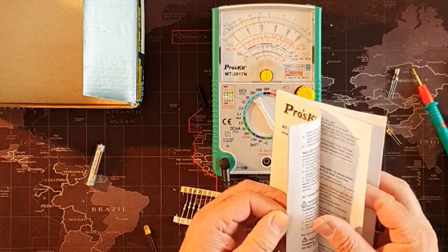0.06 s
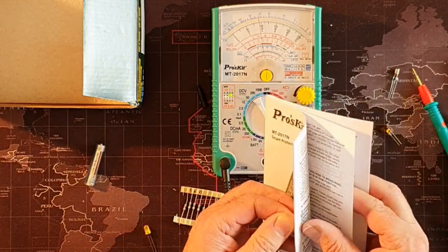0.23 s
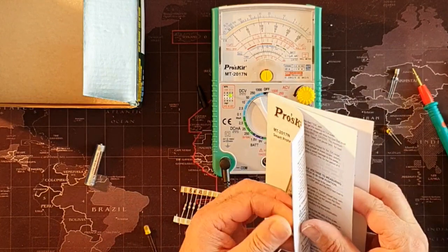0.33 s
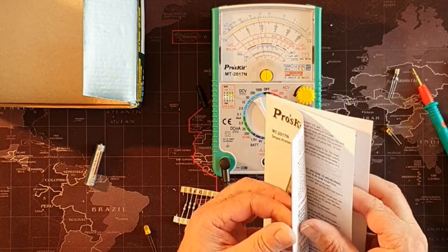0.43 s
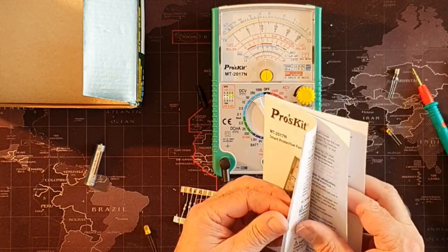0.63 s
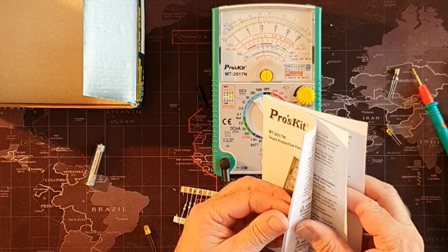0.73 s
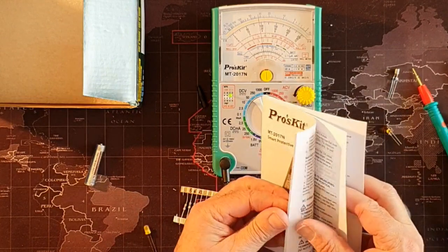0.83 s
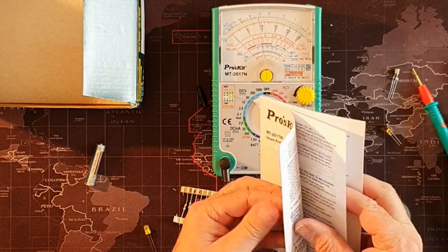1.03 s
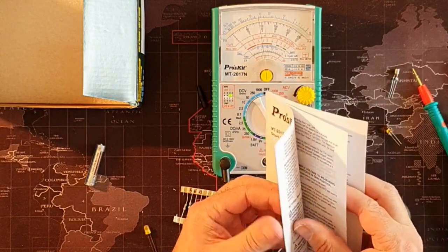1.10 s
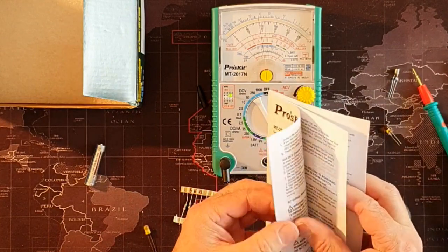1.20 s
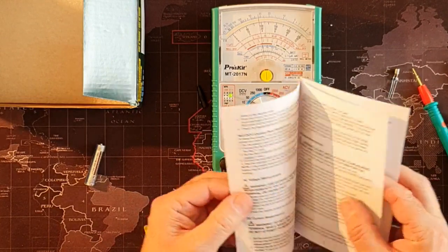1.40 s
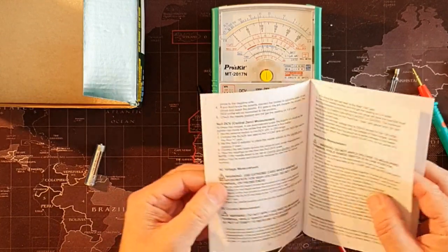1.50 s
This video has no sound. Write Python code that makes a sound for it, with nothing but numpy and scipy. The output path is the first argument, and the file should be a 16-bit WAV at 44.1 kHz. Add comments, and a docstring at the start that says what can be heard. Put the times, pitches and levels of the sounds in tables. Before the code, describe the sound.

Close, dry paper page-turning in a small room; strong snaps and edge flicks come early, one shorter flurry follows after a gap, then faint sliding and light ticks with low hand thumps over soft air noise.

```python
"""A thin paper booklet is leafed through by hand, close to the microphone, above a desk in a small room.
Bent pages snap over, edges flick off the thumb and sheets slide on each other: clusters of tiny clicks
that ring the page stack, the loose sheet, its stiff fold and its edge. The fingers add dull bumps, made of
low decaying sines. Behind them lie a short room tail, soft air noise, a faint hum and stereo hiss."""
import sys
import numpy as np
from scipy import signal
from scipy.fft import rfft, irfft
from scipy.io import wavfile
from scipy.ndimage import uniform_filter1d

SR = 44100
rng = np.random.default_rng(int(sys.argv[2]) if len(sys.argv) > 2 else 0)


def wav_out(sig):
    """Save sig, one row per channel (or a flat mono array), as 16-bit PCM at SR to the path in sys.argv[1]."""
    wavfile.write(sys.argv[1], SR, np.round(np.clip(np.atleast_2d(sig).T, -1, 1) * 32767).astype(np.int16))


N = 68355

# Bent pages buckling; the bend sets the pitch ratio. Levels are burst energy against one unit click.
# columns: time_s, scatter_s, pitch_ratio, stack_db, sheet_db, fold_db, edge_db
PAGE_SNAPS = [(0.0845, 0.00037, 0.55, -17.5, -24, -45, -45), (.1356, 0.0011, 0.83, -9.5, -12.5, -19, -15),
              (0.2145, 0.0033, 1.007, 10, 3, -0.5, -31), (0.2315, 0.008, 0.83, -18, -7.5, -30, -34),
              (0.3901, 0.0016, 0.91, -2.5, 2.5, -2, -12), (0.3944, 0.0022, 0.89, -2, 4, 0, -8),
              (0.4529, 0.0019, 0.99, -19, -14.5, -15.5, -28), (0.5289, 0.00065, 0.95, -13, 0.5, -12.5, -8),
              (0.5665, 0.003, 0.83, -21.5, -16, -0.5, -15), (0.8419, 0.00037, 1.0, -9, -4.5, -17.5, -12),
              (1.2669, 0.00067, 1.03, -19.5, -15, -13.5, -26),
              (1.2734, 0.0039, 0.98, -27, -16.5, -14.5, -16), (1.4526, 0.004, 1.02, -28, -16.5, -18, -21),
              (1.4603, 0.0025, 0.91, -29, -33, -23, -27), (1.545, .002, 0.98, -27, -24, -23.5, -31)]
# Page edges scraping past the thumb or a neighbouring page, levels as for the snaps.
# columns: peak_s, rise_s, fall_s, pitch_ratio, stack_db, sheet_db, fold_db, edge_db
EDGE_FLICKS = [(0.138, 0.011, 0.011, 0.84, -10.5, -33, -31, -31),
               (0.2165, 0.0015, 0.0024, 0.68, -23, -4.5, -3, -6),
               (0.2166, 0.00092, 0.014, 0.3, -9, -31, -10, -35),
               (0.3943, 0.0026, 0.0059, 0.57, -6.5, -8, -7, -0.5),
               (0.4003, 0.0031, 0.005, 1, -5.5, 9.5, 2.5, -11),
               (0.46, 0.0064, 0.0043, 0.41, -11.5, -43, -43, -32),
               (0.5293, .0005, 0.0067, 0.682, -16, -7, -27, -34),
               (0.5614, 0.00065, 0.0044, 0.934, -14, 0, -7, -18),
               (0.5686, 0.0023, 0.0039, 1.02, -44, 0, -1.5, -10),
               (.571, 0.005, 0.012, 0.562, -4.5, -16, -6.5, -20),
               (0.6053, 0.0033, 0.019, 1.047, -13, -7, -16, -12),
               (0.612, 0.0076, 0.0097, 0.52, -15, -41, -20, -17),
               (0.838, 0.0064, 0.0016, 0.97, -13, -9, -7, -9.5),
               (.843, 0.012, 0.016, 0.48, -8.5, -13, -7.5, -22),
               (0.849, 0.0079, 0.0033, 0.99, -16, -2, -10, -12.5),
               (0.858, 0.0012, 0.0027, 1.1, -12.5, -10, -19, -42),
               (1.177, 0.0079, 0.0037, 1.04, -20.5, -21, -15.5, -18),
               (1.285, 0.0025, 0.0099, 0.92, -16, -24.5, -14, -20),
               (1.307, 0.0036, 0.0069, 1.03, -40, -19.5, -22, -26),
               (1.317, 0.004, 0.0024, .97, -36, -36, -17, -35),
               (1.426, 0.0023, 0.0012, 1.08, -24, -22.5, -24, -30)]
# Sheets sliding on each other.
# columns: start_s, length_s, stack_db, sheet_db, fold_db, edge_db
SHEET_SLIDES = [(0.02, 0.22, -52.5, -61.5, -62, -56.5), (0.218, 0.09, -51.5, -51.5, -54.5, -54),
                (0.288, 0.08, -56.5, -59, -66, -55.5), (0.476, 0.077, -55, -51.5, -55, -46),
                (0.585, 0.036, -76, -47.5, -49, -50.5), (0.631, 0.06, -58, -50, -56, -55),
                (0.788, 0.1325, -51.5, -50, -57.5, -56), (0.905, 0.19, -63.5, -67, -61, -60),
                (.988, 0.027, -67, -59, -53, -57.5), (1.176, 0.061, -51.5, -55.5, -52, -56),
                (1.227, 0.111, -62, -55.5, -56, -58), (1.345, 0.058, -56.5, -57.5, -49.5, -55.5),
                (1.389, 0.12, -58, -68, -62, -66), (1.481, .11, -56.5, -51.5, -48.5, -50)]
# Hands bumping the booklet.
# columns: time_s, pitch_hz, level_db
HAND_BUMPS = [(0.213, 78, -25.5), (0.388, 69.4, -24), (0.454, 86, -25.5), (0.573, 49.3, -19),
              (.605, 89, -25), (0.841, 81, -16), (1.355, 75, -15), (1.419, 122, -19), (1.46, 74.4, -19),
              (1.51, 73, -27)]

# Spectra of the four paper parts that the clicks ring; only the shape counts.
# columns: freq_hz, level_db
STACK_TONE = [(40, -20.5), (130, -16.5), (280, -6), (480, -4.5), (620, -1), (820, -1.5), (1130, -1),
              (1500, -3.5), (2500, -6.5), (5000, -26.5), (16000, -93.5)]
SHEET_TONE = [(100, -47), (700, -31), (1300, -20.5), (1850, -3), (2200, -9), (2430, 1), (2700, 1.5),
              (3500, -13.5), (5000, -20.5), (16000, -73)]
FOLD_TONE = [(200, -56), (1800, -16.5), (3000, -10.5), (3600, -1), (4250, 0.5), (4900, -19), (6300, -24),
             (9000, -30), (16000, -55)]
EDGE_TONE = [(300, -4), (2500, -22.5), (5000, -5), (6200, -2), (7200, -3), (9500, 1.5), (11500, -3),
             (13000, -4.5), (16000, -13.5)]
PAPER_PARTS = [STACK_TONE, SHEET_TONE, FOLD_TONE, EDGE_TONE]

# Tone of the room's diffuse tail; only the shape counts.
# columns: freq_hz, level_db
ROOM_TONE = [(60, -3), (250, -1.5), (500, 3), (1200, 3), (2000, -3.5), (4000, -4.5), (8000, 4.5),
             (16000, -9)]
# Ringing modes of the room.
# columns: pitch_hz, level_db, t60_s
ROOM_RINGS = [(512, -61.5, 0.52)]
# Spectra of the still air and of the left-right hiss; only the shape counts.
# columns: freq_hz, level_db (per Hz)
AIR_TONE = [(15, -35), (28, -5), (48, 6), (70, -5.5), (130, -2.5), (300, -7.5), (500, -5.5), (900, -15.5),
            (2500, -15), (5000, -18.5), (10000, -20.5), (16000, -21.5)]
SIDE_HISS_TONE = [(20, 7.5), (60, -1), (250, -5), (1000, -13.5), (4000, -20), (7000, -9.5), (11000, -28.5),
                  (16000, -13)]

BURST_SIZE = 8192  # samples, with the event in the middle
SNAP_CLICKS_PER_S, FLICK_CLICKS_PER_S, SLIDE_CLICKS_PER_S = 5000, 4600, 3800
SNAP_SCATTER_DB = 2  # energy of the scatter against the first click
CLICK_SPREAD_DB, SLIDE_SPREAD_DB = 3.5, 3.5
SLIDE_FADE_S, SLIDE_WAVER_DB = 0.014, 1
BUMP_RISE_S, BUMP_FALL_S = 0.0016, 0.021
ROOM_DB, ROOM_DELAY_S = -17, 0.0061
ROOM_T60_S, TREBLE_T60_S, ROOM_SPLIT_HZ = 0.27, 0.19, 3000
AIR_DB, SIDE_HISS_DB = -52.5, -69
HUM_HZ, HUM_DB, HUM_WANDER = 139, -57, 0.0092  # wander is a fraction of the pitch
HUM_START_S, HUM_LENGTH_S, HUM_FADE_S = 0.95, 0.38, 0.097
TOP_HZ = 15700


def undb(db):
    """Decibels to gain."""
    return 10 ** (np.asarray(db) / 20)


def unit(x):
    """Scale to the energy of one unit click."""
    return x / np.sqrt(np.sum(x ** 2) + 1e-18)


def colour(x, points, ratio=1):
    """Ring x through a causal, unit-energy response with the given spectrum, moved in pitch by ratio."""
    size = 2048
    hz, db = np.array(points, float).T
    bins_hz = np.maximum(np.fft.rfftfreq(size, 1 / SR), 1)
    gain = undb(np.interp(np.log(bins_hz), np.log(hz * ratio), db))
    # folding the cepstrum forward gives minimum phase: the ring starts at once
    cepstrum = irfft(np.log(gain))
    cepstrum[1:size // 2] *= 2
    cepstrum[size // 2 + 1:] = 0
    response = unit(irfft(np.exp(rfft(cepstrum))))
    return signal.fftconvolve(x, response)[:len(x)]


def clicks(rate, spread_db, size=N):
    """Tiny slips of paper fibre at random moments, of uneven size and either sign; rms 1."""
    there = rng.random(size) < rate / SR
    unevenness = np.minimum(rng.exponential(size=size), np.pi)
    force = undb(spread_db * unevenness) * rng.choice([-1, 1], size)
    return unit(there * force) * np.sqrt(size)


def walk(rate):
    """Slow random drift with a spread of 1, drawing rate new values a second."""
    hold = int(SR / rate)
    steps = np.repeat(rng.standard_normal(N // hold + 1), hold)
    drift = uniform_filter1d(steps, hold)[:N]
    return drift / drift.std()


def burst_time():
    """Seconds from the middle of a burst."""
    return (np.arange(BURST_SIZE) - BURST_SIZE // 2) / SR


def swell(rise, fall):
    """Exponential rise to a peak in the middle of a burst, then exponential fall."""
    t = burst_time()
    return np.exp(np.where(t < 0, t / max(rise, 1 / SR), -t / max(fall, 1 / SR)))


def gate(start, length, fade):
    """Fade in, hold, fade out."""
    t = np.arange(N) / SR - start
    return np.clip(np.minimum(t, length - t) / fade, 0, 1)


def add(out, burst, at):
    """Mix in a burst with its middle at the given time."""
    i = np.arange(BURST_SIZE) - BURST_SIZE // 2 + int(at * SR)
    inside = (i >= 0) & (i < N)
    out[i[inside]] += burst[inside]


def snaps():
    """A page buckles: one sharp click, then a quick scatter as the sheet settles."""
    out = np.zeros(N)
    for at, scatter_s, ratio, *levels in PAGE_SNAPS:
        for spectrum, db in zip(PAPER_PARTS, levels):
            slips = clicks(SNAP_CLICKS_PER_S, CLICK_SPREAD_DB, BURST_SIZE)
            push = undb(SNAP_SCATTER_DB) * unit(slips * swell(0, scatter_s))
            push[BURST_SIZE // 2] += 1  # the sharp click
            add(out, undb(db) * unit(colour(push, spectrum, ratio)), at)
    return out


def flicks():
    """An edge lets go: ringing slips swell to a peak, then die away."""
    out = np.zeros(N)
    for at, rise, fall, ratio, *levels in EDGE_FLICKS:
        for spectrum, db in zip(PAPER_PARTS, levels):
            slips = clicks(FLICK_CLICKS_PER_S, CLICK_SPREAD_DB, BURST_SIZE)
            grain = colour(slips, spectrum, ratio)
            add(out, undb(db) * unit(grain * swell(rise, fall)), at)
    return out


def slides():
    """Sheets rub: a soft, wavering stream of slips rings every part of the paper."""
    out = np.zeros(N)
    waver = undb(SLIDE_WAVER_DB * walk(70))
    for part, spectrum in enumerate(PAPER_PARTS):
        pressure = np.zeros(N)
        for start, length, *levels in SHEET_SLIDES:
            pressure += undb(levels[part]) * gate(start, length, SLIDE_FADE_S)
        slips = clicks(SLIDE_CLICKS_PER_S, SLIDE_SPREAD_DB)
        out += colour(waver * pressure * slips, spectrum)
    return out


def hands():
    """Dull bumps of the fingers: a low swing of the booklet that dies within a few cycles."""
    out = np.zeros(N)
    for at, hz, db in HAND_BUMPS:
        swing = np.sin(2 * np.pi * hz * burst_time())
        add(out, undb(db) * unit(swing * swell(BUMP_RISE_S, BUMP_FALL_S)), at)
    return out


def room(x):
    """Reflections: a short diffuse tail whose treble dies sooner, and a faint ringing tone."""
    t = np.arange(N) / SR

    def decay(t60):
        """Silence until the first reflection, then a 60 dB fall per t60."""
        return np.exp(-np.log(1000) * t / t60) * (t > ROOM_DELAY_S)

    noise = colour(rng.standard_normal(N), ROOM_TONE)
    low = signal.sosfilt(signal.butter(2, ROOM_SPLIT_HZ, fs=SR, output="sos"), noise)
    high = signal.sosfilt(signal.butter(2, ROOM_SPLIT_HZ, "high", fs=SR, output="sos"), noise)
    # the bands are out of phase at the split, so subtracting joins them without a notch
    echo = undb(ROOM_DB) * unit(low * decay(ROOM_T60_S) - high * decay(TREBLE_T60_S))
    for hz, db, t60 in ROOM_RINGS:
        echo += undb(db) * np.sin(2 * np.pi * hz * t) * decay(t60)
    return signal.fftconvolve(x, echo)[:N]


def still_air():
    """Steady room air: coloured noise."""
    return undb(AIR_DB) * colour(rng.standard_normal(N), AIR_TONE)


def hum():
    """A faint passing hum: one sine of wandering pitch that fades in and out."""
    pitch_hz = HUM_HZ * (1 + HUM_WANDER * walk(11.8))
    phase = 2 * np.pi * np.cumsum(pitch_hz) / SR
    tone = np.sqrt(2) * np.sin(phase)  # rms 1
    return undb(HUM_DB) * tone * gate(HUM_START_S, HUM_LENGTH_S, HUM_FADE_S)


def side_hiss():
    """Coloured hiss of opposite sign in left and right, which widens the background."""
    hiss = undb(SIDE_HISS_DB) * colour(rng.standard_normal(N), SIDE_HISS_TONE)
    return hiss * np.array([[1], [-1]])


def scene():
    """The booklet straight ahead, in its room, over the stereo background."""
    booklet = snaps() + flicks() + slides() + hands()
    return booklet + room(booklet) + still_air() + hum() + side_hiss()


def record(dry):
    """The recorder cuts the top with a steep low-pass."""
    return signal.sosfilt(signal.ellip(8, .2, 70, TOP_HZ, fs=SR, output="sos"), dry)


dry = scene()
out = record(dry)
wav_out(out)
```